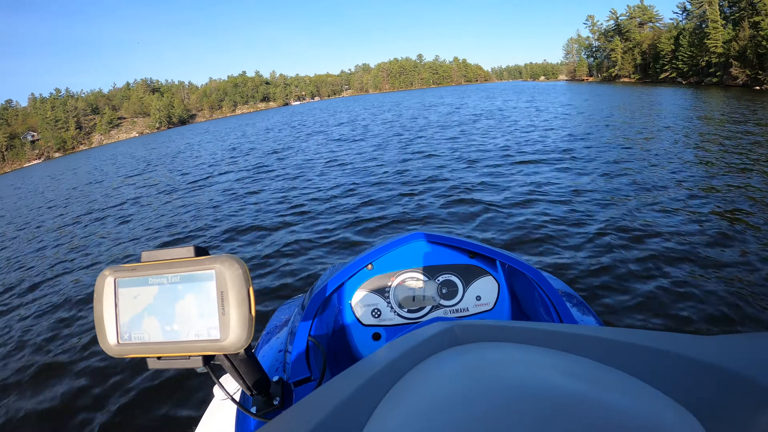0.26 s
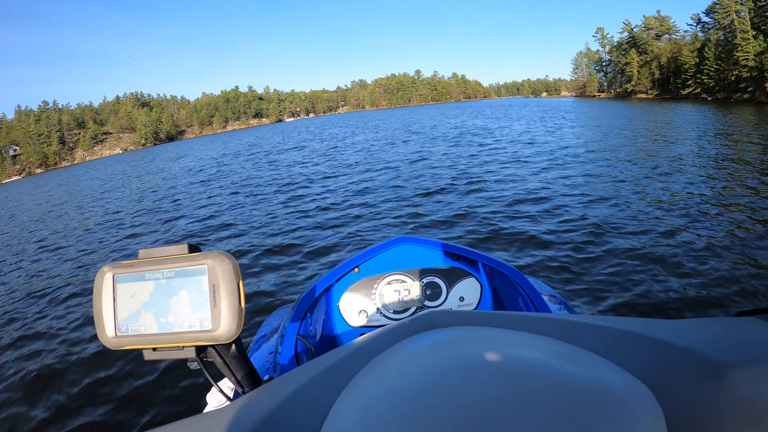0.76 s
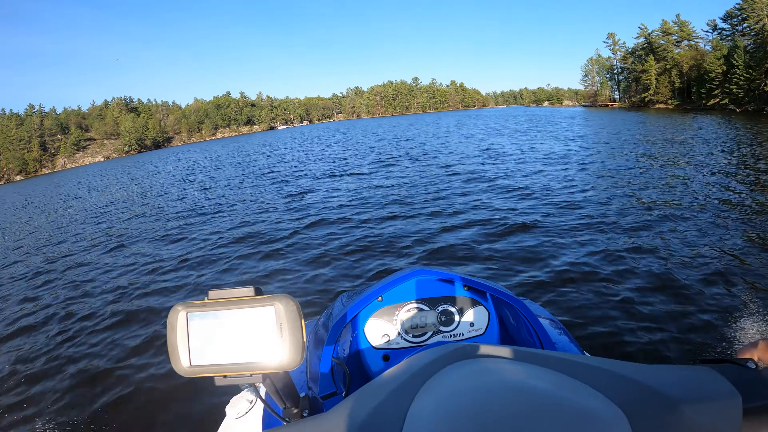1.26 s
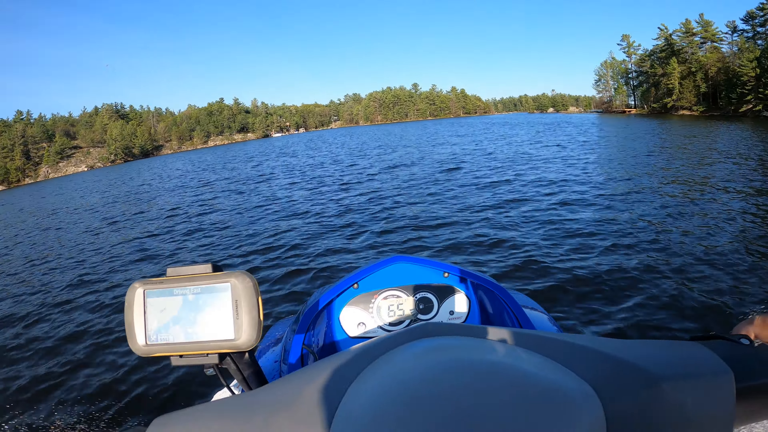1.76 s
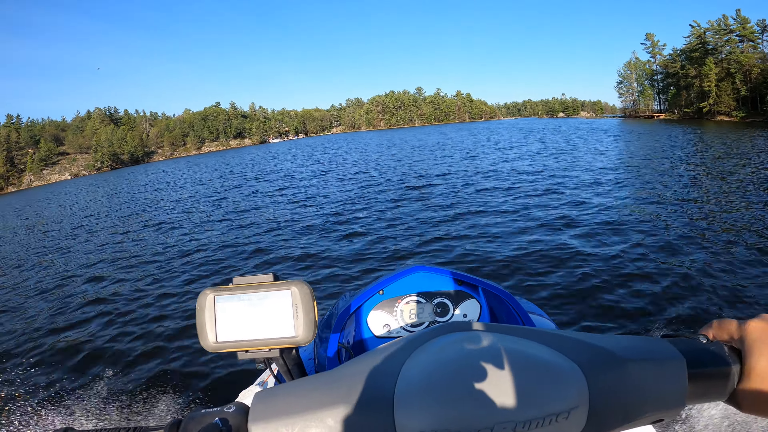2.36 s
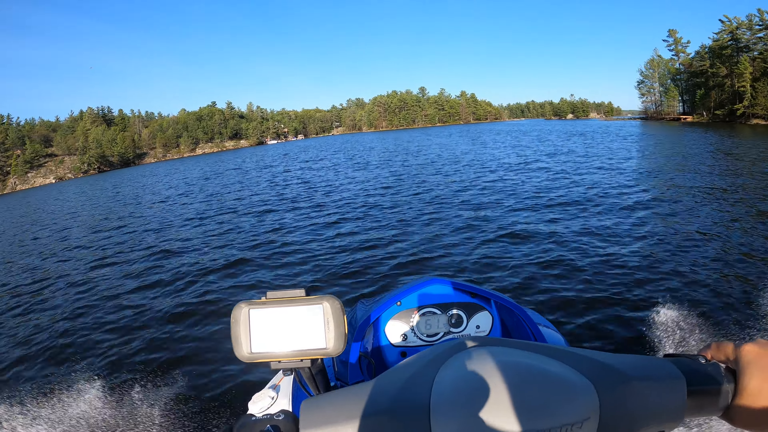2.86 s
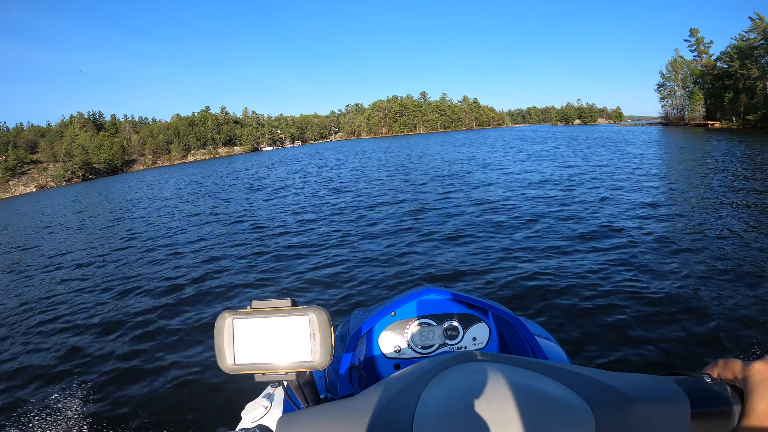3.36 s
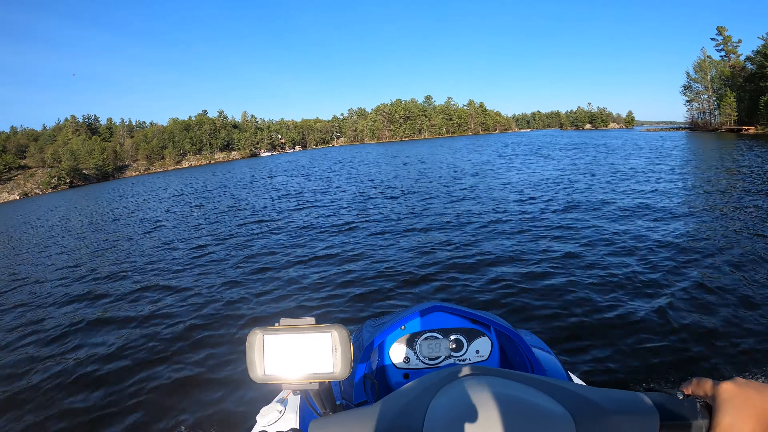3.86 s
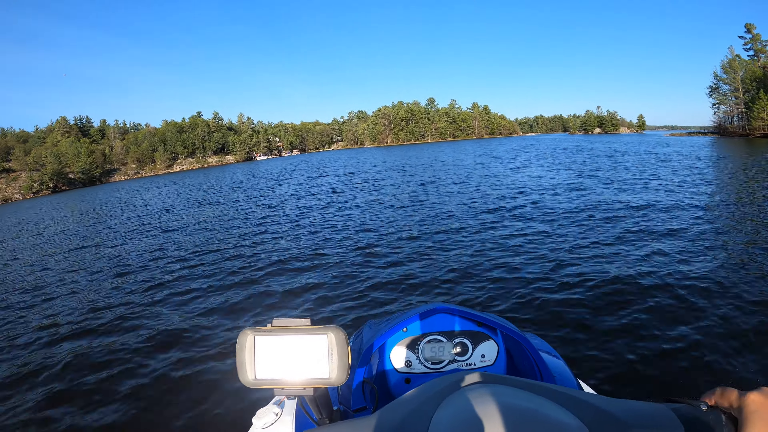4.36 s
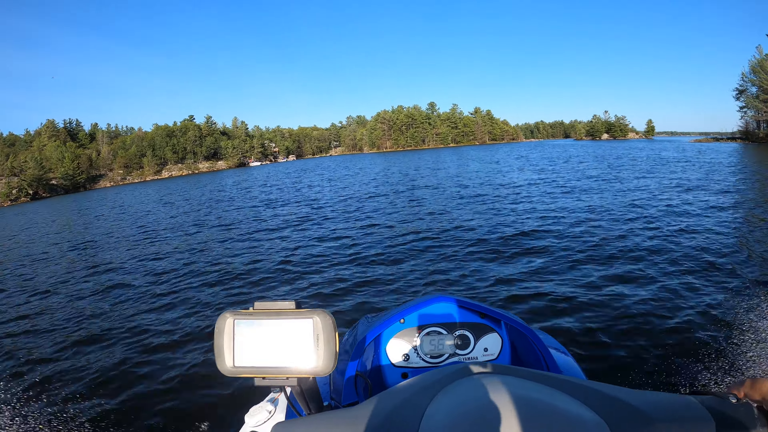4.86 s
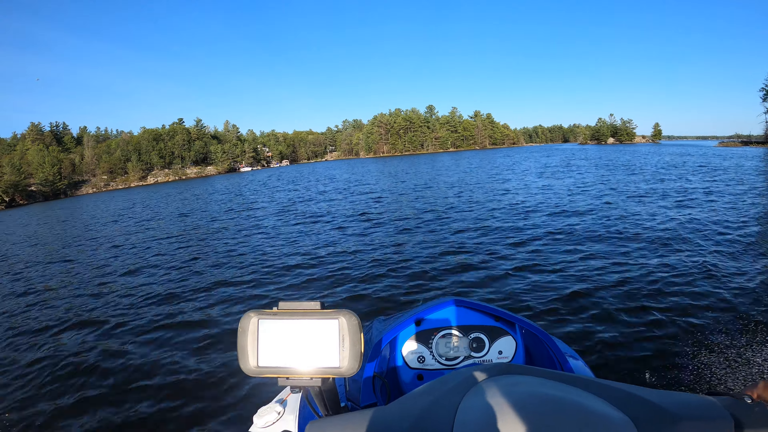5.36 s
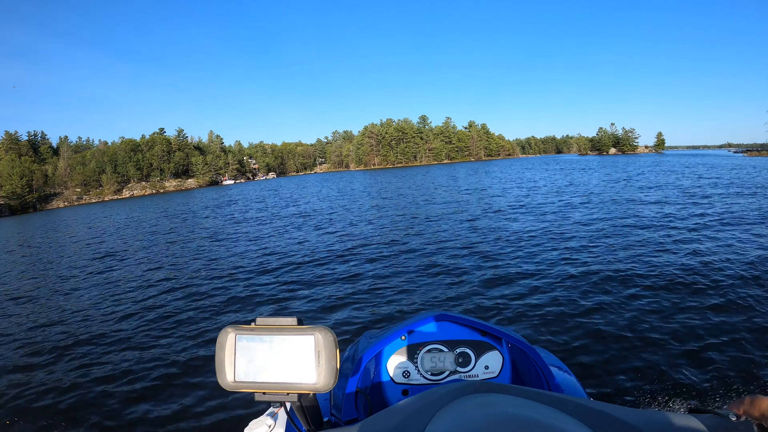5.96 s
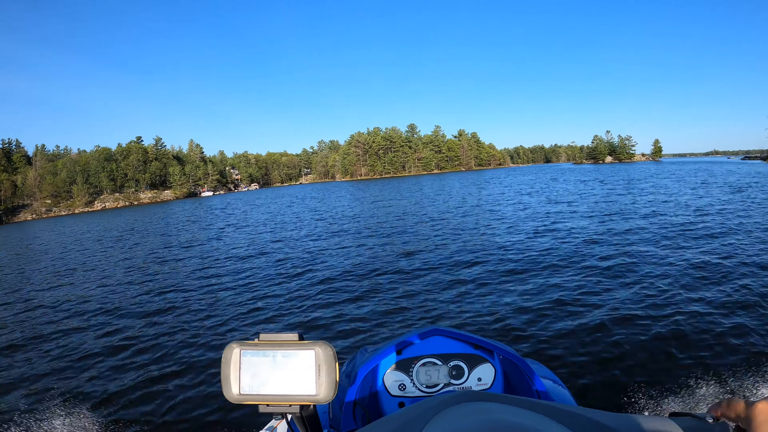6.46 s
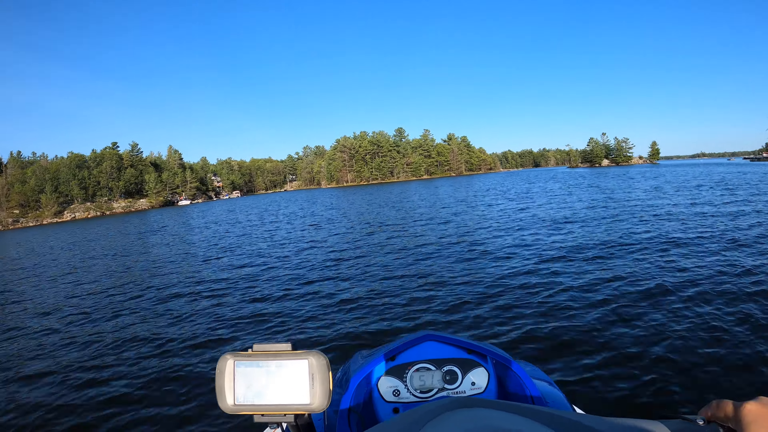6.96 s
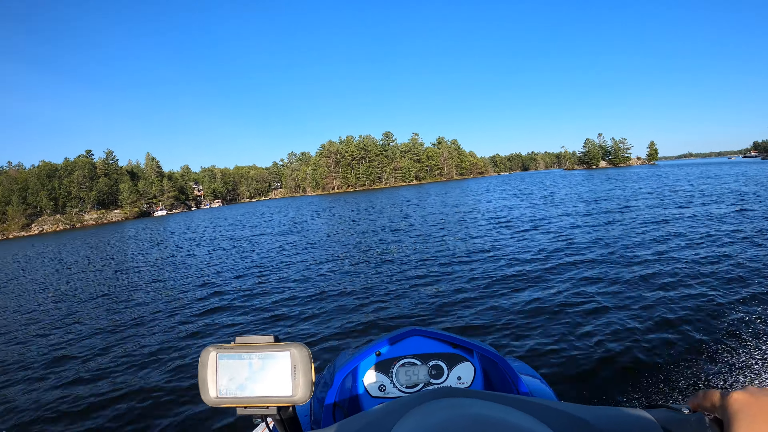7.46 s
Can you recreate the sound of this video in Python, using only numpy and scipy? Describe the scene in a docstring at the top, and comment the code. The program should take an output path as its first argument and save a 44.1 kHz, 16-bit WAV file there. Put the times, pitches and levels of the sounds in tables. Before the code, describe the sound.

A small watercraft engine labours, howls and gulps air for the first second, then frees up into a smooth, deep hum with faint gear whine. Irregular wave hits boom in the hull, burst into spray and briefly smother the exhaust tone. Low wind rumble lies beneath. The sound is close, outdoors and dry, with slightly dulled treble and peaks held down, captured on board.

```python
"""A three-cylinder four-stroke personal watercraft on a rippled lake, heard from the rider's seat.
At first the intake growls, the exhaust rasps and howls, and the jet pump churns, gulps and coughs: resonated pulses and noise.
As the speed gathers these fade, the deep exhaust tone grows and steadies, and shaft and gear tones hum and whine along.
Throughout, wavelets drum on the hollow hull and throw spray, both filtered noise, and may briefly smother the exhaust.
Wind buffets the microphone as low noise, and a limiter holds the peaks down."""
import sys
import numpy as np
from scipy.fft import rfft, irfft, next_fast_len
from scipy.io import wavfile
from scipy.ndimage import uniform_filter1d, minimum_filter1d, map_coordinates

SR = 44100
rng = np.random.default_rng(int(sys.argv[2]) if len(sys.argv) > 2 else 0)


def materialize(psi):
    """Save the field psi as 16-bit PCM at rate SR to the path in sys.argv[1].

    A 1-D psi becomes a single channel; in a 2-D psi each row is a channel.
    """
    bounded = np.clip(np.atleast_2d(psi).T, -1, 1)
    quanta = np.round(bounded * 32767).astype(np.int16)
    wavfile.write(sys.argv[1], SR, quanta)


N = 340011

# head wind, before the buffeting gain: (time [s], level [dB])
WIND_LEVEL = [(0, -22), (.88, -20.5), (1.05, -29), (1.3, -23), (1.6, -26), (1.88, -23.5), (2.4, -27),
              (3.08, -25), (3.5, -31), (3.85, -31.5), (4.2, -28.5), (4.4, -32), (5.0, -27.5), (5.95, -28.5),
              (6.3, -32), (6.65, -29.5), (7.45, -26.5), (7.7, -27)]
# colour of wind on the microphone: (frequency [Hz], relative density [dB per Hz])
WIND_SPECTRUM = [(8, -5.5), (22, 1.5), (50, 4), (80, -1), (120, -4.5), (200, -3.5), (500, -28),
                 (1500, -84.5)]
BUFFET_GAIN_DB = 2.5

# hull meeting a wavelet; positive smothering sinks the drone, a negative value in any dB column has no effect:
# (time [s], build-up [s], spray surge [dB], drumming surge [dB], exhaust smothering [dB])
WAVELETS = [(0.765, 0.033, 4.5, -2, -4), (0.921, 0.12, 3.5, 2, 3), (1.16, 0.047, 4, -1.5, -2),
            (1.308, 0.066, 2, 4, 7.5), (1.45, 0.072, -1.5, 3.5, 22), (1.55, 0.037, -1.5, 4, 0.5),
            (1.681, 0.084, 1.5, 4.5, -0.5), (1.82, 0.1, 3, 3.5, -1), (2.05, 0.074, 2, 2.5, 0.5),
            (2.22, .06, 1.5, 2, 14), (2.421, 0.1, 3.5, 4, -3), (2.53, 0.067, 0.5, 4.5, 11),
            (2.789, 0.073, 4, 5, 2), (3.069, 0.062, 7.5, 2, 20), (3.17, 0.11, 5.5, 4, 3),
            (3.26, 0.023, 1.5, -1, -9), (3.369, 0.047, 3.5, 3, 11), (3.51, .03, 5, -2, -0.5),
            (3.63, 0.11, 5.5, 5.5, 3.5), (3.719, 0.057, 3, 3.5, 2), (4.03, 0.11, 4.5, 3, -7),
            (4.185, 0.13, 7.5, 5.5, 4), (4.481, 0.15, 7, 4.5, 7.5), (4.78, 0.23, 8, 4, 7.5),
            (5.041, 0.18, 5.5, 1, 2), (5.231, 0.069, 7.5, 2, -6), (5.35, 0.13, 5.5, 4.5, 16),
            (5.44, 0.056, 3.5, 3, -4.5), (5.571, 0.043, 3.5, 5.5, 3), (5.84, 0.069, 6, 3.5, 1),
            (5.955, 0.096, 6.5, 1.5, 3), (6.17, 0.096, 6, 2.5, -1.5), (6.621, 0.041, 4, 5.5, 11),
            (6.681, .05, 8, 3.5, 5.5), (6.76, 0.089, 7, 3, 1), (6.87, 0.069, 7, 3.5, 4),
            (6.959, 0.064, 3.5, 3, 6.5), (7.099, 0.047, 4, -1, 1.5), (7.267, 0.17, 6.5, 2.5, 4),
            (7.491, 0.11, 7.5, 5, 18), (7.66, 0.08, 3.5, 3.5, 5)]
FALL_S, SMOTHER_S = .086, .033  # Gaussian time scales: fall of a surge, half-width of a smothering
# colour of water tearing along the hull: (frequency [Hz], relative density [dB per Hz])
WASH_SPECTRUM = [(250, -11), (500, 2), (800, -3.5), (1050, -5), (1380, 0.5), (1750, -10), (2600, -11),
                 (4500, -19.5), (9000, -36)]
# colour of spray thrown off the bow: (frequency [Hz], relative density [dB per Hz])
SPRAY_SPECTRUM = [(300, -8), (700, 6), (1350, 5), (1800, 0), (3000, -.5), (4000, -3), (5200, -7),
                  (7000, -10), (8500, -12), (15000, -20)]
CALM_SPRAY_DB, CALM_WASH_DB, CALM_DRUM_DB = -48, -41.5, -19.5  # levels between wavelets
WASH_FOLLOWS, DRONE_SINKS = .5, .31  # dB per dB of spray surge
# water slapping the side of the hull: (time [s], level [dB])
SLAPS = [(1.232, -31), (1.468, -33.5), (1.697, -37), (1.966, -35.5), (2.285, -30.5), (2.53, -33.5),
         (3.059, -32.5), (3.086, -29.5), (3.132, -30.5), (3.19, -34), (3.705, -37.5), (4.2, -30),
         (4.74, -32), (4.82, -31.5), (5.324, -30.5), (5.43, -30), (5.97, -32.5), (7.175, -35.5),
         (7.29, -32.5), (7.521, -30.5)]
SLAP_S = .008  # Gaussian half-width of a slap

# resonances of the hollow hull: (frequency [Hz], width [Hz], relative level [dB])
HULL_MODES = [(161.7, 24, -3), (205.8, 47, -1), (255.4, 39, 4.5), (308, 78, -7), (408, 93, -15),
              (540, 110, -27.5), (714, 220, -34.5)]
PLOUGH_DB, PLANING_S = 1.5, 4.7  # extra drumming at the start, and the time over which it vanishes

# jet pump churning air and bubbles: (time [s], level [dB])
CHURN_LEVEL = [(0, -36), (.48, -40), (.62, -34.5), (.8, -43), (.88, -39), (1.25, -38), (1.8, -55.5),
               (3.2, -48.5), (4, -59)]
# resonances of the pump tunnel: (frequency [Hz], width [Hz], relative level [dB])
TUNNEL_MODES = [(715, 70, 5), (925, 130, 3), (1080, 150, -4), (1280, 170, -1), (1520, 140, -8)]
# pump gulping air and coughing it out: (time [s], level [dB])
GULPS = [(.412, -30), (.547, -29), (.626, -26), (.640, -22), (.672, -27), (.703, -26), (.734, -25.5),
         (.755, -27.5), (.773, -26), (.831, -29), (.960, -29), (1.004, -29)]
GULP_S = .006  # Gaussian half-width of a gulp
# colour of a cough: (frequency [Hz], relative density [dB per Hz])
COUGH_SPECTRUM = [(350, -18), (650, 4), (900, 0), (1100, -4), (1350, -2), (1700, -13), (2300, -24),
                  (4000, -45), (12000, -90)]
# falling gurgles along with two of the gulps: (time [s], starting frequency [Hz], relative level [dB])
GURGLES = [(.670, 560, -19), (.771, 720, -21)]
GURGLE_S, GURGLE_FALL_S = .012, .035  # time scales of the swell and of the fall in pitch

# intake growl while the engine lugs: (time [s], level [dB])
GROWL_LEVEL = [(0, -29), (.2, -24.5), (.45, -26), (.7, -31), (1.1, -40.5), (2, -73.5)]
# resonances of the air box: (frequency [Hz], width [Hz], relative level [dB])
AIRBOX_MODES = [(282, 91, 3.5), (363, 64, -1), (1210, 320, -14.5), (1985, 240, -15), (3560, 2300, -30.5)]

# throttle, and the load of the waves on the pump: (time [s], crankshaft speed [rpm])
CRANK_SPEED = [(0, 3985), (.2, 3700), (.36, 3660), (.5, 3870), (.64, 3950), (.75, 4170), (.85, 4230),
               (.97, 4130), (1.08, 4290), (1.18, 4290), (1.3, 4440), (1.42, 4310), (1.55, 4450),
               (2.05, 4475), (2.3, 4515), (2.85, 4530), (3.08, 4465), (3.3, 4505), (3.62, 4525),
               (3.85, 4495), (5.25, 4495), (5.45, 4550), (5.72, 4485), (5.9, 4570), (6.1, 4535),
               (6.85, 4625), (7.2, 4650), (7.45, 4730), (7.7, 4760)]
# weaker crankshaft tones, before they sink and swell with the drone:
# (multiple of crankshaft speed [1], level [dB])
CRANK_TONES = [(2, -37), (4, -38.5), (5, -33), (6, -40), (7, -50), (8, -42.5), (10, -51), (14, -55)]
# geared shaft tones, before they sink and swell with the drone:
# (multiple of geared shaft speed [1], level [dB])
SHAFT_TONES = [(3, -43), (4, -47), (5, -51), (6, -58)]
GEAR_RATIO = 2.213  # geared shaft turns per crankshaft turn
# added level of the geared shaft's lowest tone: (time [s], gain [dB])
SHAFT_SWELL = [(0, -2.5), (4.4, 1), (5, -7.5), (6.2, -2.5), (6.7, -4), (7.05, 12), (7.35, -4), (7.7, 0)]
# gear teeth meshing, at full speed rise: (multiple of crankshaft speed [1], level [dB])
GEAR_TONES = [(30, -60.5), (31, -66), (62, -73.5), (93, -72)]

# exhaust rasp, by how hard the engine labours: (time [s], level [dB])
RASP_LEVEL = [(0, -23), (.35, -27), (1.3, -29.5), (1.85, -25), (2.3, -30.5), (3, -30), (3.6, -41.5),
              (7.7, -40.5)]
# exhaust resonances when hot, before the pitch share: (frequency [Hz], width [Hz], relative level [dB])
PIPE_MODES = [(305, 32, 0), (370, 100, 4.5), (602, 88, 0)]
# the pipe's pitch follows the heat of the gas: (time [s], share of the listed frequency [1])
PIPE_PITCH = [(0, .975), (.18, .925), (.33, .95), (.5, .962), (.62, .99), (.75, 1.008), (1.15, 1.028),
              (1.5, 1.02), (1.8, 1.05), (2.1, 1.003), (2.3, .995)]
# howl of the pipe under load: (time [s], level [dB])
HOWL_LEVEL = [(0, -32.5), (.25, -49), (.35, -30), (.6, -33), (.76, -30.5), (.95, -36), (1.15, -34.5),
              (1.5, -34), (1.8, -33.5), (2.15, -39), (2.6, -55), (3.4, -70)]
HOWL_HZ = 607  # before the pitch share
# drone as the hull rises out of the water, before the wavelets act on it: (time [s], level [dB])
DRONE_LEVEL = [(0, -23.5), (.5, -22.5), (.85, -18), (1.08, -14), (1.42, -20), (1.8, -16), (2.4, -16.5),
               (2.7, -14), (3.8, -12), (5.5, -13), (7.7, -11.5)]

# microphone behind its waterproof membrane: (frequency [Hz], gain [dB])
MIC_RESPONSE = [(5, -25), (22, 0), (8300, 0), (10000, -5.5), (12000, -12.5), (15000, -25)]
TOP_HZ = 15100  # band limit


def amp(db):
    """Logarithmic level: decibels become an amplitude ratio."""
    return 10 ** (np.asarray(db) / 20)


def unit(x):
    """Normalisation: scale a signal to rms 1."""
    return x / np.sqrt(np.mean(x ** 2) + 1e-20)


def curves(rows):
    """Linear interpolation: one value per sample for each column after the time."""
    s, *columns = np.transpose(rows)
    return [np.interp(np.arange(N) / SR, s, column) for column in columns]


def wobble(rate):
    """Band-limited fluctuation: a smooth random curve with rate knots a second."""
    knots = rng.standard_normal(2048)
    coarse = np.arange(0, N + 64, 64)
    curve = map_coordinates(knots, [coarse * rate / SR], mode="mirror")
    return np.interp(np.arange(N), coarse, curve)


def noise():
    """White noise: independent Gaussian samples."""
    return rng.standard_normal(N)


def sparse_noise(per_s):
    """Poisson-like impulses: random samples of random strength, per_s a second on average."""
    return (rng.random(N) < per_s / SR) * noise()


def filtered(x, response):
    """Linear filtering: multiply the spectrum by a response of frequency."""
    m = next_fast_len(N + SR // 2)
    return irfft(rfft(x, m) * response(np.fft.rfftfreq(m, 1 / SR)), m)[:N]


def shape(points):
    """Spectral envelope: gain at any frequency along (Hz, dB) points."""
    hz, db = np.transpose(points)
    return lambda f: amp(np.interp(np.log(f + 1), np.log(hz), db))


def coloured(x, spectrum):
    """Spectral colouring: x through (Hz, dB) points, at rms 1."""
    return unit(filtered(x, shape(spectrum)))


def resonated(x, modes, skirt, muffle_hz):
    """Modal resonance in a muffling shell, at rms 1; a higher skirt steepens the flanks."""
    def response(f):
        power = 0
        for centre, width, db in modes:
            damping = (f * width) ** 2
            peak = damping / ((centre * centre - f * f) ** 2 + damping)
            power = power + amp(db) ** 2 * peak ** skirt
        return np.sqrt(power / (1 + (f / muffle_hz) ** 2) ** 3)
    return unit(filtered(x, response))


def bursts(rows, half_s):
    """Transient envelope: a sum of Gaussian bursts at (s, dB) rows."""
    t = np.arange(0, N / SR, .0005)
    envelope = sum(amp(db) * np.exp(-((t - s) / half_s) ** 2) for s, db in rows)
    return curves(np.transpose([t, envelope]))[0]


def tones(turns, orders, waver_db, drift, rate):
    """Rotational harmonics: multiples of a shaft's turns, wavering in level and phase (drift in radians)."""
    total = 0
    for multiple, db in orders:
        level = np.sqrt(2) * amp(db + waver_db * wobble(rate / 2))
        cycles = round(multiple) * turns + rng.random()
        total = total + level * np.sin(2 * np.pi * cycles + drift * wobble(rate))
    return total


def ploughing():
    """Transition to planing: falls evenly from 1 while the hull ploughs to 0 once it planes."""
    return np.clip(1 - np.arange(N) / SR / PLANING_S, 0, 1)


def ride():
    """Wave encounter: each surge builds, peaks and falls; gives spray, drumming and smothering in dB."""
    s, build_s, spray_db, drum_db, dip_db = np.transpose(WAVELETS)[:, :, None]
    t = np.arange(0, N / SR, .002)
    u = t - s
    swell = np.exp(-(u / np.where(u < 0, build_s, FALL_S)) ** 2)
    dip = np.exp(-(u / SMOTHER_S) ** 2)
    # at each moment the largest value among all wavelets holds
    peaks = [(spray_db * swell).max(axis=0), (drum_db * swell).max(axis=0), (dip_db * dip).max(axis=0)]
    return curves(np.transpose([t, *peaks]))


def wind():
    """Turbulent pressure: the head wind breaks into low lumps on the microphone."""
    gust_db, = curves(WIND_LEVEL)
    lumps = amp(1.6 * wobble(15)) * coloured(noise(), WIND_SPECTRUM)
    return amp(BUFFET_GAIN_DB + gust_db) * unit(lumps)


def wash(surge_db):
    """Flow noise: water tears along the hull, swelling by a share of each spray surge."""
    slosh = amp(.9 * wobble(16) + 1.1 * wobble(90))
    level = amp(CALM_WASH_DB + WASH_FOLLOWS * surge_db)
    return level * slosh * coloured(noise(), WASH_SPECTRUM)


def spray(surge_db):
    """Sheet break-up: the bigger the surge, the more the noise tears into clumps."""
    flicker = amp(.6 * wobble(45) + .6 * wobble(140))
    drops = unit(sparse_noise(600))
    clumps = amp(surge_db * (.14 * wobble(170) + .24 * wobble(700)))
    sheet = (noise() + .27 * drops) * flicker * clumps
    level = amp(CALM_SPRAY_DB + surge_db + .5 * wobble(23))
    return level * coloured(sheet, SPRAY_SPECTRUM)


def slaps():
    """Impact noise: a crest breaks against the hull in a short bright splash."""
    splash = [(300, -12.0), (700, 8.0), (1400, -2.5), (2000, -10), (4000, -16), (9000, -30.5)]
    return bursts(SLAPS, SLAP_S) * coloured(noise(), splash)


def hull(surge_db):
    """Cavity resonance: water pounds the shell in quick uneven shoves and makes it boom."""
    shoves = noise() * amp(1.4 * wobble(45))
    drum_db = CALM_DRUM_DB + surge_db + PLOUGH_DB * ploughing()
    return amp(drum_db) * resonated(shoves, HULL_MODES, skirt=1.305, muffle_hz=1800)


def churn():
    """Bubble noise: bubbles collapse in the jet pump and ring its tunnel."""
    churn_db, = curves(CHURN_LEVEL)
    pops = unit(sparse_noise(900))
    froth = (noise() + .41 * pops) * amp(1.5 * wobble(60))
    return amp(churn_db) * resonated(froth, TUNNEL_MODES, skirt=1.6, muffle_hz=7100)


def gulps():
    """Air ingestion: the pump coughs in noise bursts; with two of them a gurgle falls in pitch."""
    sound = bursts(GULPS, GULP_S) * coloured(noise(), COUGH_SPECTRUM)
    for s, hz, db in GURGLES:
        t = np.maximum(np.arange(N) / SR - s, 0)
        cycles = hz * GURGLE_FALL_S * (1 - np.exp(-t / GURGLE_FALL_S))
        life = t / GURGLE_S
        envelope = np.sqrt(life) * np.exp(-life ** 2 / 2)
        sound = sound + 2 * amp(db) * envelope * np.sin(2 * np.pi * cycles)
    return sound


def growl(turns):
    """Intake resonance: each cylinder sucks a thump and a ragged gasp of air through the air box."""
    growl_db, = curves(GROWL_LEVEL)
    # three strokes in two turns
    stroke = .5 + .5 * np.cos(3 * np.pi * turns + .3 * wobble(40))
    size = amp(4.5 * wobble(70))
    thumps = resonated(stroke ** 24 * size, AIRBOX_MODES, skirt=1.4, muffle_hz=6000)
    gasps = resonated(noise() * (.89 + stroke) * size, AIRBOX_MODES, skirt=1.7, muffle_hz=6000)
    return amp(growl_db) * (.65 * thumps + .8 * gasps)


def howl():
    """Flow-excited resonance: gas keeps the pipe ringing on a ragged note that glides with its pitch."""
    pitch, = curves(PIPE_PITCH)
    howl_db, = curves(HOWL_LEVEL)
    phase = 2 * np.pi * np.cumsum(HOWL_HZ * pitch) / SR
    phase = phase + 1.0 * wobble(30) + .35 * wobble(90)
    raggedness = amp(2.5 * wobble(50) + 2 * wobble(14))
    return amp(howl_db) * unit(raggedness * np.sin(phase))


def rasp(beats, speed_rise):
    """Pipe resonance: each beat sends a pulse and a puff of turbulent gas through gliding resonances."""
    rasp_db, = curves(RASP_LEVEL)
    pitch, = curves(PIPE_PITCH)
    pulse = (.5 + .5 * np.cos(2 * np.pi * beats)) ** 6 * amp(3 * wobble(220))
    kicks = coloured(pulse, [(250, -29.5), (400, -13.0), (560, -7.5), (2000, 8.5)])
    puffs = unit(noise() * (.5 + pulse))
    # the pulses soften as the engine frees up
    blast = .19 * (1 - .5 * speed_rise) * kicks + 2 * puffs
    # the glide cross-fades between fixed pipes of neighbouring pitch
    steps = np.linspace(.91, 1.05, 5)
    gliding = 0
    for step, share in zip(steps, np.eye(len(steps))):
        modes = np.array(PIPE_MODES) * [step, 1, 1]
        gliding = gliding + np.interp(pitch, steps, share) * resonated(blast, modes, skirt=1.56, muffle_hz=4000)
    return amp(rasp_db) * gliding


def drone(beats, drone_db, speed_rise):
    """Low-pass silencing: exhaust pulses round into one deep tone, broken at first and steadying later."""
    flutter = amp(1.96 * wobble(45))
    jitter = .15 * wobble(30) + .07 * wobble(9)
    jitter = jitter + .9 * ploughing() * wobble(16)
    jitter = jitter + np.sqrt(1 - speed_rise) * wobble(45)
    return np.sqrt(2) * amp(drone_db) * flutter * np.sin(2 * np.pi * (beats + rng.random()) + jitter)


def engine(drone_db):
    """Periodic firing: three cylinders fire in two turns; the drone lies at twice the firing rate."""
    rpm, = curves(CRANK_SPEED)
    sing_db, = curves(SHAFT_SWELL)
    speed_rise = np.clip((rpm - rpm[0]) / 550, 0, 1)
    # the shaft runs unevenly until the pump has its grip
    stumble = .03 * (1 - speed_rise) * wobble(16)
    turns = np.cumsum(rpm / 60) / SR + stumble
    beats = 3 * turns
    crank = tones(turns, CRANK_TONES, waver_db=3.2, drift=.65, rate=16)
    lowest, *upper = [tones(GEAR_RATIO * turns, [row], waver_db=2.5, drift=.6, rate=12) for row in SHAFT_TONES]
    shaft = amp(sing_db) * lowest + sum(upper)
    whine = speed_rise * tones(turns, GEAR_TONES, waver_db=2, drift=1.5, rate=26)
    # crankshaft and geared shaft tones sink and swell slightly with the drone
    swell = amp(.044 * (drone_db - drone_db.mean()))
    exhaust = drone(beats, drone_db, speed_rise) + rasp(beats, speed_rise)
    return exhaust + growl(turns) + swell * (crank + shaft) + whine


def scene():
    """Superposition: wind, water, hull, pump and engine add at the rider's seat."""
    spray_db, drum_db, smother_db = ride()
    open_db, = curves(DRONE_LEVEL)
    drone_db = open_db - DRONE_SINKS * spray_db - smother_db
    lake = wash(spray_db) + spray(spray_db) + slaps() + hull(drum_db)
    pump = churn() + gulps()
    return (wind() + lake + pump + howl() + engine(drone_db))[None]


def limiter(x, ceiling_db=-6.5, release_db_per_s=200, size=160):
    """Peak limiting: gain ducks just ahead of each peak above the ceiling and recovers more slowly."""
    peak_gain = np.minimum(1, amp(ceiling_db) / (np.abs(x) + 1e-9))
    over_db = -minimum_filter1d(20 * np.log10(peak_gain), size)
    recovery_db = release_db_per_s * np.arange(N) / SR
    duck_db = np.maximum.accumulate(over_db + recovery_db) - recovery_db
    return x * amp(-uniform_filter1d(duck_db, size))


def record(dry):
    """Band limiting: after the limiter, the membrane dulls the treble and nothing passes the band limit."""
    membrane = shape(MIC_RESPONSE)
    return filtered(limiter(dry[0]), lambda hz: membrane(hz) * (hz < TOP_HZ))[None]


dry = scene()
out = record(dry)
materialize(out)
```